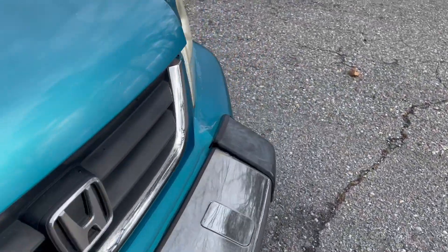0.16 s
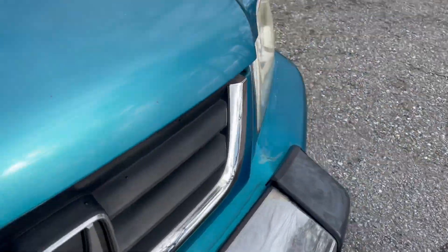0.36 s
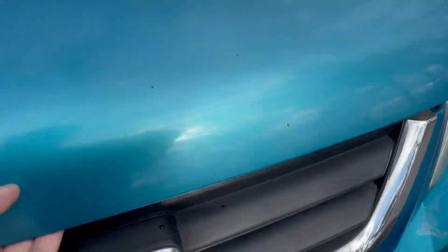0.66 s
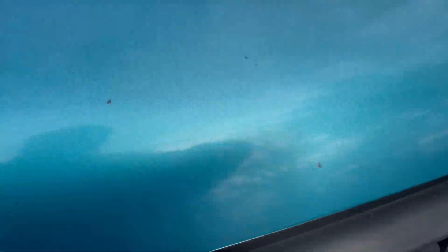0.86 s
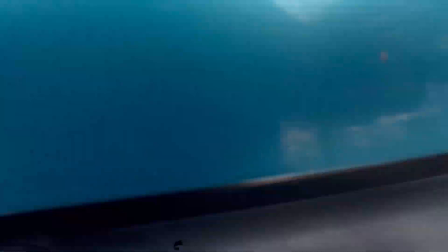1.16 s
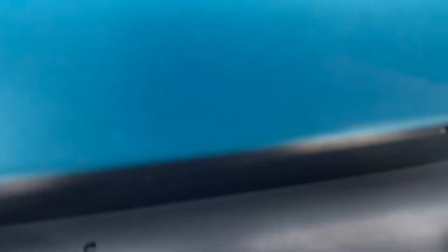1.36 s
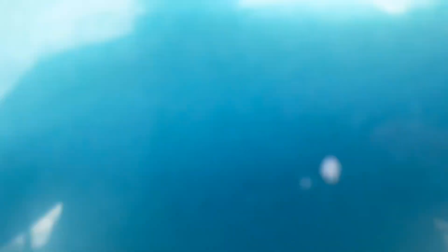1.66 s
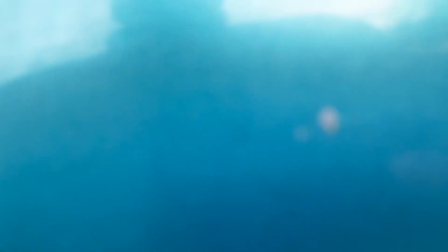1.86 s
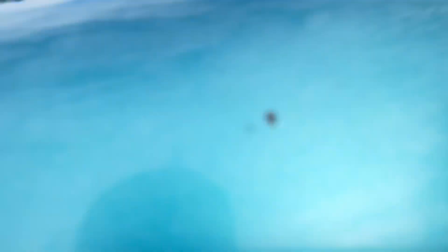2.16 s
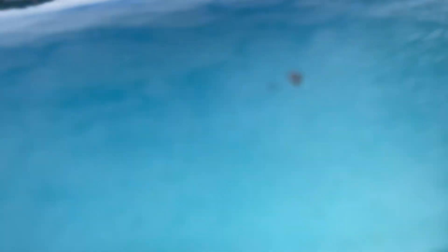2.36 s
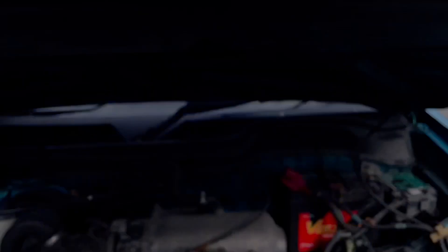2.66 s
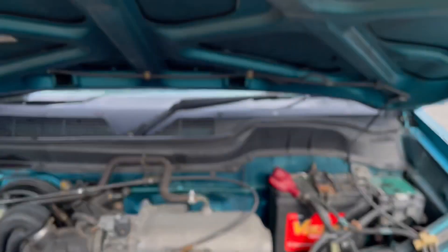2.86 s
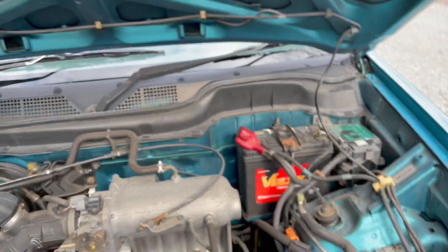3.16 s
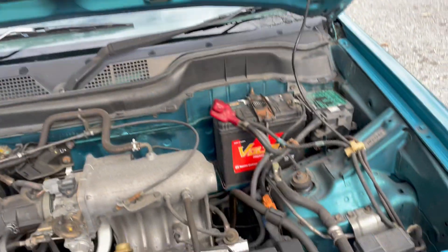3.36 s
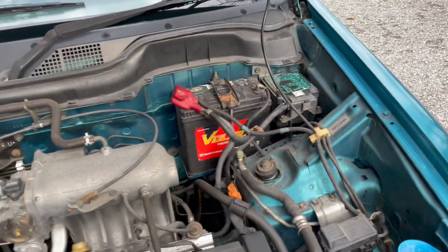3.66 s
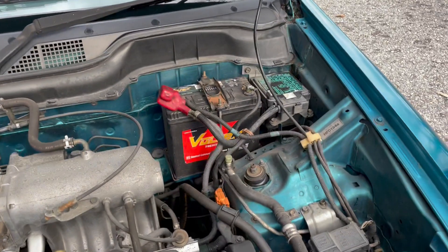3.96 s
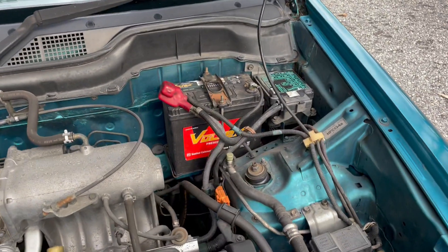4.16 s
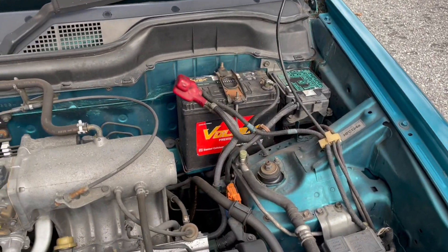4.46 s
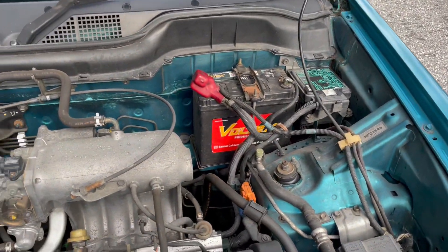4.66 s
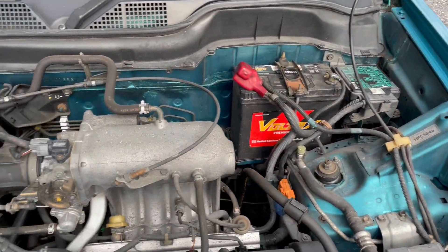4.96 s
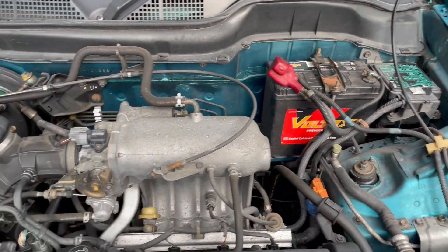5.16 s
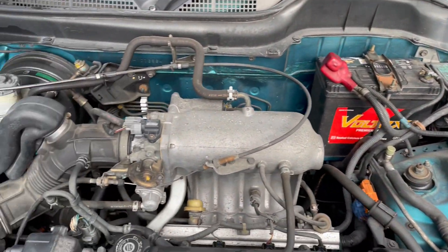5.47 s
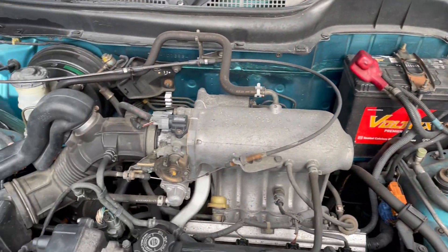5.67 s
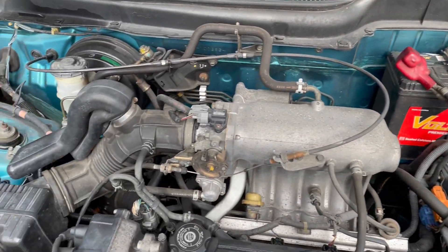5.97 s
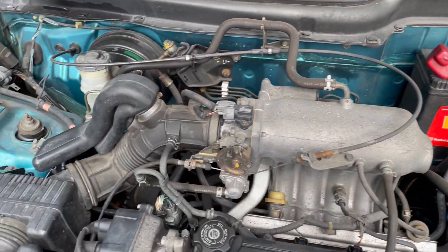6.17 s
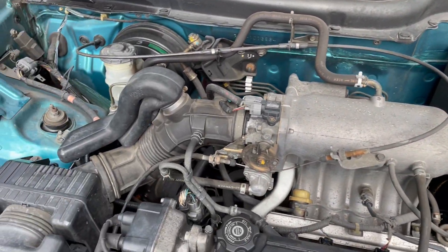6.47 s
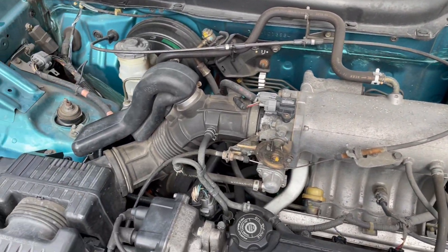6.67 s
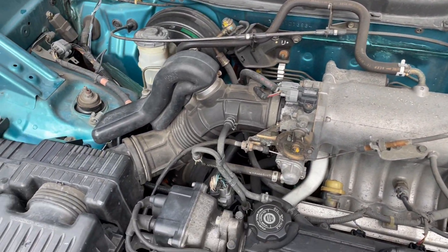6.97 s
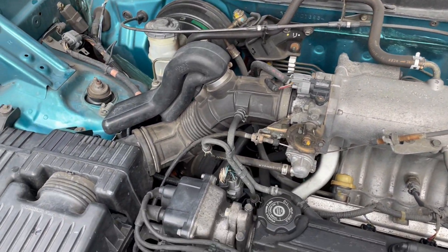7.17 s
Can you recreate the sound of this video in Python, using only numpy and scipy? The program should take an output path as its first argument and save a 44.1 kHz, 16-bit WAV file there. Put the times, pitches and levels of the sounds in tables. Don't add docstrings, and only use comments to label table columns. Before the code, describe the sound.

A small engine idles steadily close to a handheld microphone in open air. Small dull finger taps come first, followed by two hard metallic clacks under a second apart with short panel ringing. As the hood opens, muffled roar turns brighter, with fast repeating injector and valve ticks and soft steady belt and fan whine. Wind buffets the microphone in irregular low thumps, easing toward the end.

```python
import sys
import numpy as np
from scipy import signal
from scipy.fft import rfft, irfft
from scipy.io import wavfile
from scipy.ndimage import uniform_filter1d

SR = 44100
rng = np.random.default_rng(int(sys.argv[2]) if len(sys.argv) > 2 else 0)


def generate_wav(signal):
    frames = np.transpose(np.atleast_2d(signal))
    scaled = np.clip(frames, -1, 1) * 32767
    pcm = np.round(scaled).astype(np.int16)
    wavfile.write(sys.argv[1], SR, pcm)


def invert_db(level):
    return 10 ** (np.asarray(level, dtype=float) / 20)


N = 323253
T = np.arange(N) / SR
HZ = np.fft.rfftfreq(N, 1 / SR)


def unit(x):
    return x / np.sqrt(np.mean(x ** 2))


def curves(table):
    s, *columns = np.transpose(table)
    return [np.interp(T, s, column) for column in columns]


def shaped(x, gain):
    return irfft(rfft(x) * gain, N)


def resonance(hz, width):
    return 1j * HZ * width / (hz ** 2 - HZ ** 2 + 1j * HZ * width)


def walk(rate):
    points = int(rate * N / SR) + 2
    return unit(np.interp(T * rate, np.arange(points), rng.standard_normal(points)))


# peak_s, length_s, rumble_db, small_eddies_relative_db
GUST_SWELLS = [(.75, 0.49, -34.5, -8.5), (1.164, 0.069, -28, -19), (1.277, 0.18, -28.5, -4),
               (1.457, 0.18, -29.5, -4.5), (1.57, 0.14, -26.5, -3.5), (1.715, .12, -27, -5),
               (1.93, 0.18, -30.5, -0.5), (2.087, 0.16, -35, 2), (2.243, .15, -32, -7),
               (2.378, 0.13, -26, -6), (2.533, 0.16, -28.5, -7.5), (2.877, .2, -31.5, -8),
               (3.183, 0.24, -27.5, -11), (3.462, 0.18, -27, -13), (3.587, 0.13, -25.5, -5.5),
               (3.774, 0.24, -27, -6), (4.017, .15, -36, -9), (4.398, 0.73, -31.5, -8.5),
               (4.62, 0.091, -28, -5), (4.878, 0.43, -26.5, -2.5), (5.244, 0.13, -29, -8),
               (5.47, 0.17, -31, -4.5), (5.75, 0.62, -40.5, -25), (5.963, 0.1, -28, -7),
               (6.202, 0.27, -47, -14), (6.564, 0.1, -35, -11), (6.917, .35, -33, -10),
               (7.28, 0.085, -30, -24)]


def gusts():
    breeze_db, breeze_small_db = -43, -1.5
    s, length, db, small_db = np.transpose(GUST_SWELLS)[:, :, None]
    power = invert_db(2 * db) * np.exp(-8 * ((T - s) / length) ** 2)
    large = invert_db(2 * breeze_db) + power.sum(axis=0)
    small = invert_db(2 * (breeze_db + breeze_small_db)) + (power * invert_db(2 * small_db)).sum(axis=0)
    return np.sqrt(large), np.sqrt(small)


def eddy(hz, cycles):
    u = np.arange(int(cycles * 2.8 * SR / hz)) * hz / SR
    swell = u / cycles * 3
    return np.sin(2 * np.pi * u / (1 + 0.035 * u)) * swell * np.exp(1 - swell)


def eddy_swarm(lo_hz, hi_hz, rate, strength):
    swarm = np.zeros((2, N))
    for hz in np.geomspace(lo_hz, hi_hz, num=5):
        arrives = rng.random((2, N)) < rate / 5 / SR
        sign = rng.choice([-1, 1], (2, N))
        size_db = 3.8 * np.minimum(rng.exponential(size=(2, N)), 2.6)
        hits = arrives * sign * invert_db(size_db)
        swarm += signal.fftconvolve(hits, eddy(hz, cycles=1.61)[None])[:, :N]
    bed = shaped(rng.standard_normal((2, N)), resonance(np.sqrt(lo_hz * hi_hz), hi_hz - lo_hz))
    swarm += 0.5 * np.std(swarm) * unit(bed)
    steady = swarm / uniform_filter1d(swarm ** 2, size=3500, axis=1) ** 0.28
    return unit(steady) * strength


# start_s, peak_db, pitch_hz, left_minus_right_db
LONE_EDDIES = [(0.714, -15, 92, 2), (0.791, -14, 156, 0.5), (1.277, -6, 81, 2), (1.326, -7, 124, 3),
               (1.359, -7, 182, 3), (1.476, -4, 171, 1), (1.542, -2.5, 134, 7), (1.568, -5.5, 93, 3),
               (1.717, -3, 81.7, 5), (1.775, -3.5, 143, 4), (1.819, -5.5, 246, 5), (1.867, -11, 85, 4),
               (2.185, -11.5, 147, 0.0), (2.226, -12.5, 114, 4), (2.35, -8, 110, 0.5),
               (2.489, -14, 116, -9), (3.182, -4.5, 104, 3), (3.34, -10, 216, 5), (3.426, -13, 134, 1),
               (3.555, -10, 96.9, -2), (3.717, -6.5, 156, 0.5), (3.799, -15, 87.4, 2),
               (4.077, -12.5, 102, -1), (4.713, -11.5, 113, 0.5), (4.758, -5.5, 268, 0.0),
               (4.843, -20, 172, 0.0), (4.948, -12, 180, 0.5), (4.999, -11, 95.5, 1.0),
               (5.471, -13, 170, 2), (5.968, -11, 81.5, 1)]


def lone_pops():
    out = np.zeros((2, N))
    for s, db, hz, pan_db in LONE_EDDIES:
        pop = eddy(hz, cycles=0.68)
        i = int((s + 0.00773) * SR)
        sides = invert_db(db - 5.0 + np.array([pan_db, -pan_db]) / 2)
        out[:, i:i + len(pop)] += np.outer(sides, pop[:N - i])
    return out


def wind():
    large, small = gusts()
    mid, side = eddy_swarm(50.6, 170, 110., large) + eddy_swarm(202, 567, 160., small * invert_db(2.0))
    out = np.array([mid + 0.28 * side, mid - 0.31 * side]) + lone_pops()
    return signal.sosfilt(signal.butter(4, 1500, fs=SR, output="sos"), out)


# start_s, peak_db, ring_hz, decay_t60_s
FINGER_TAPS = [(.245, -21, 1300, .012), (.262, -27, 1100, .02), (.314, -28, 1300, .04),
               (.602, -21, 600, .012), (.61, -28, 800, .07), (.618, -25, 1300, .06), (.626, -24, 900, .05),
               (.634, -27, 1500, .05), (.6435, -17, 1450, .03), (1.168, -27, 2500, .15),
               (1.19, -15, 330, .16), (1.186, -16, 750, .12), (1.915, -13, 800, .22), (1.92, -15, 330, .25),
               (1.471, -17, 800, .03), (1.892, -25, 4200, .2), (1.898, -18, 4500, .06),
               (3.7235, -14, 520, .02), (3.566, -17, 380, .02), (3.172, -20, 380, .03)]


def taps():
    out = np.zeros((2, N))
    for s, db, hz, t60 in FINGER_TAPS:
        scuff = rng.standard_normal((2, N)) * (T >= s) * invert_db(-60 * np.maximum(T - s, 0) / t60)
        hit = shaped(scuff, resonance(hz, 0.55 * hz) ** 2)
        out += invert_db(db) * hit / abs(hit[0]).max()
    return out


# start_s, peak_db, hollow_ring_hz, panel_db, crack_db, decay_t60_s, rattle_rise_s
LATCH_BLOWS = [
    (1.1815, -6, 430, 3, -7, .085, .003),
    (1.9025, -1.5, 560, 3, -1, .065, .006),
]
# pitch_hz, level_db, decay_t60_s
HOOD_MODES = [(1177, -7, 0.13), (1508, -1, 0.016), (1873, -0.5, 0.2), (3052, 2.5, 0.16), (3340, -6, 0.059),
              (3980, -3, 0.023), (4580, -2, 0.076), (4280, -17, 0.1), (4960, -26, 0.12), (6730, 0, 0.02)]


def latch():
    out = np.zeros((2, N))
    panel = 0
    for k, (hz, db, t60) in enumerate(HOOD_MODES):
        panel = panel + invert_db(db) * resonance(hz, 2.17 / t60 * 2.8) * (-1) ** k
    dull = 1 / (1 + 1j * HZ / 6500) ** 3
    crack_ring = 0.5 * resonance(7700, 7700) + 0.14 * resonance(9500, 2900) ** 2
    for s, db, hz, panel_db, crack_db, t60, rise in LATCH_BLOWS:
        age = np.maximum(T - s, 0)
        build_up = np.minimum(age / rise, 1)
        noise = rng.standard_normal((2, N)) * (T >= s)
        rattle = noise * (0.25 + build_up) * invert_db(-60 * np.maximum(age - rise, 0) / t60)
        crack = noise * invert_db(crack_db - 60 * age / 0.03)
        flutter_db = 3.7 * walk(rate=120.)
        hollow = build_up * invert_db(-60 * age / (2 * t60) + flutter_db) * np.sin(2 * np.pi * hz * age)
        metal = invert_db(panel_db) * (0.91 * panel + 0.5 * resonance(1750, 1570))
        hit = shaped(rattle, dull * (resonance(hz, 0.5 * hz) + metal)) + shaped(crack, crack_ring)
        hit[0] += 0.24 * abs(hit[0]).max() * hollow
        out += invert_db(db) * hit / abs(hit[0]).max()
    return out


def whine(table, waver_hz, flutter_db):
    hz, db = curves(table)
    fade = np.clip((T - table[0][0]) / 0.14, 0, 1)
    phase = 2 * np.pi * np.cumsum(hz + waver_hz * walk(rate=25.)) / SR
    return np.sqrt(2) * fade * invert_db(db + flutter_db * walk(rate=15.)) * np.sin(phase)


# start_s, pitch_hz, level_db
FAN_TONE = [(0, 410, -58), (.5, 405, -46.5), (1.1, 408, -59), (1.4, 404, -39), (5.6, 403.6, -70),
            (6.2, 407, -44), (7.33, 407, -45)]


def fan():
    return whine(FAN_TONE, waver_hz=2., flutter_db=2.)


# start_s, pitch_hz, level_db
PUMP_TONE = [(2.85, 441, -46), (3.1, 440, -41), (3.7, 440, -42), (4.1, 434, -49), (4.6, 436, -43),
             (5.6, 432, -45), (6.1, 435, -40), (7.33, 436, -40)]


def pump():
    return whine(PUMP_TONE, waver_hz=3.5, flutter_db=3.)


# start_s, pitch_hz, level_db
ALTERNATOR_TONE = [(0, 488, -50), (2.2, 488, -48), (2.8, 488, -44), (3.4, 488, -49), (4.2, 488, -49),
                   (4.7, 488, -45), (6, 488, -42), (7.33, 488, -42)]


def alternator():
    return whine(ALTERNATOR_TONE, waver_hz=1.5, flutter_db=2.5)


# start_s, nearness_db, hood_opening_0_to_1, place_0_to_1 (battery to valve cover)
PHONE_PATH = [(0, -6, 0.08, 0), (.5, 0.5, 0, 0.051), (1.1, 1.5, 0, 0.55), (1.35, 4, 0.25, 0.29),
              (1.65, 0.5, 0.31, 0.29), (1.95, 2, .65, 0.3), (2.15, 2, 0.85, 0.99), (2.3, 0, 0.82, 0.49),
              (2.8, 0.5, 1, 0.14), (3.3, -.5, 0.99, 0.2), (4.4, 0, 1, 0), (5, .5, 1, 0.081),
              (5.7, 1, 0.96, 0.5), (6.2, 1, 0.96, 0.77), (7.33, 0.5, 0.9, 0.65)]


def visit():
    near_db, opening, along = curves(PHONE_PATH)
    opening, along = np.clip(opening, 0, 1), np.clip(along, 0, 1)
    ajar = 4 * opening * (1 - opening)
    return near_db, opening, ajar, opening * (1 - along), along


# hood_shut_db, hood_open_db, valve_cover_extra_db, nearness_share
RANGE_LEVELS = [
    (-44, -41, 0.5, 0.13),
    (-40, -36.5, 0.5, 1.3),
    (-45.5, -36.5, 0.5, 0.82),
    (-52, -38, -0.6, 0.78),
]
# pitch_hz, width_hz, level_db
SHUT_COLOUR = [(950, 210, -9), (1610, 120, -2.5), (2020, 180, 1.5), (4700, 700, 2)]
AJAR_COLOUR = [(850, 170, -4), (1260, 200, 1.5), (3580, 910, 5.5), (5070, 1660, -3)]
BATTERY_COLOUR = [(454, 220, -4), (1365, 110, 2.5), (3860, 1000, 2.5)]
COVER_COLOUR = [(306, 63, -16.5), (574, 150, 0)]


def escape_from_bay(spectrum):
    near_db, opening, ajar, battery, cover = visit()
    below = [1 / (1 + (HZ / edge_hz) ** 6) for edge_hz in (800, 1500, 7500)]
    shares = below[0], below[1] - below[0], below[2] - below[1], 1 - below[2]
    bands_hz = (450, 750), (800, 1500), (1500, 6000), (10000, 15000)
    out = 0
    for share, (lo_hz, hi_hz), levels in zip(shares, bands_hz, RANGE_LEVELS):
        shut_db, open_db, cover_db, heard = levels
        db = shut_db + (open_db - shut_db) * opening + cover_db * cover + heard * near_db
        band = spectrum[0, (HZ > lo_hz) & (HZ < hi_hz)]
        rms = np.sqrt(2 * np.sum(abs(band) ** 2)) / N
        out = out + irfft(spectrum * share, N) * invert_db(db) / rms
    colours = (((1 - opening) ** 2, SHUT_COLOUR), (ajar, AJAR_COLOUR),
               (battery, BATTERY_COLOUR), (cover, COVER_COLOUR))
    for weight, table in colours:
        change = sum((invert_db(db) - 1) * abs(resonance(hz, width)) ** 2 for hz, width, db in table)
        out = out + weight * shaped(out, change)
    left_minus_right_db = 0.55 - 2.7 * ajar + 2.5 * battery
    return out, left_minus_right_db


# pitch_hz, level_db_per_hz
ROAR_SPECTRUM = [(40, -16), (70, 0), (250, -8), (430, -4.5), (700, -8.5), (1300, -7), (2500, -5.5),
                 (4500, -13.5), (8000, -19.5), (11500, -20), (14200, -27), (15600, -29), (16050, -60)]
# pitch_hz, width_hz, over_roar_db
CASTING_MODES = [(620, 45, 5), (790, 25, 5), (955, 45, 4), (1270, 150, 5), (1900, 120, 5), (2310, 70, 5),
                 (3200, 110, 4), (3820, 130, 5), (4700, 90, 5), (5230, 140, 5), (6150, 130, 4),
                 (6560, 80, 5)]


def engine_colour():
    hz, db = np.transpose(ROAR_SPECTRUM)
    colour = invert_db(np.interp(np.log(HZ + 1), np.log(hz), db))
    for hz, width, db in CASTING_MODES:
        colour = colour * (1 + (invert_db(db) - 1) * abs(resonance(hz, width)) ** 2)
    return colour / (1 + (HZ / 15300) ** 60)


def decays(times, sizes, rise_ms, ms, repeat):
    hits = np.zeros(N)
    inside = (times > 0) * (times < N / SR)
    np.add.at(hits, np.clip(times * SR, 0, N - 1).astype(int), sizes * inside)
    age_ms = np.arange(2000) * 1000 / SR
    shape = np.exp(-age_ms / ms) * np.minimum(age_ms / rise_ms, 1)
    same = signal.fftconvolve(hits[None], shape * rng.standard_normal((2, len(shape))))[:, :N]
    fresh = signal.fftconvolve(hits, shape)[:N] * rng.standard_normal((2, N))
    return np.sqrt(repeat) * same + np.sqrt(1 - repeat) * fresh


# start_s, cam_late_ms (against a steady idle)
IDLE_HUNTING = [(0.08, 14.7), (0.55, 12.3), (1.03, 8.7), (1.5, 4.0), (1.98, 0.0), (2.45, -2.7),
                (2.92, -2.3), (3.4, -6.3), (3.87, -9.7), (4.35, -6.3), (4.82, -5.0), (5.3, -3.3),
                (5.77, 0.7), (6.25, 1.0), (6.72, 0.3), (7.19, 0.7)]
PART_RINGS = {"injector": ([(9700, 1600, -5), (11200, 1600, -1), (13180, 1930, 6.5)], 0.69, 7.9),
              "valve": ([(3100, 570, -7.5), (3380, 710, 2.5), (5070, 320, 6), (6300, 740, 1),
              (8650, 3600, 7.5), (12300, 5900, -5)], 3.5, 5), "tappet": ([(1470, 58, -16.5),
              (1810, 490, -1), (2420, 200, 1.5), (4720, 1600, -6), (6700, 830, -9)], 4.6, 5.2),
              "rocker": ([(1240, 720, -1), (2350, 1300, 1.5), (3780, 900, 6.5), (4400, 120, 7)], 2.8, 3.84)}
# part, start_ms, over_roar_db
CAM_PATTERN = [("injector", 4, 0.44), ("injector", 42.5, 4.7), ("injector", 82, 1.8),
               ("injector", 122, 2.3), ("valve", 15.44, 1.45), ("valve", 57, 3.5), ("valve", 97, 0.9),
               ("valve", 160, 1), ("tappet", 58, 12.6), ("tappet", 64, 2.9), ("tappet", 58, -1.4),
               ("rocker", 22.4, -1.3), ("rocker", 100, -1.8), ("rocker", 140, 1), ("rocker", 130, 3.3)]


def cam_ticks(cover):
    firing_hz = 25.3
    turns = np.arange(-1, 48) * 4 / firing_hz
    turns = turns + np.interp(turns + 2 / firing_hz, *np.transpose(IDLE_HUNTING)) / 1000
    out = np.zeros((2, N))
    for part, (rings, rise_ms, decay_ms) in PART_RINGS.items():
        ms, db = np.transpose([row[1:] for row in CAM_PATTERN if row[0] == part])
        late, harder = rng.standard_normal((2, len(turns), len(ms)))
        times = turns[:, None] + (ms + 0.71 * late) / 1000
        sizes = invert_db(db + 1.2 * harder)
        burst = decays(times.ravel(), sizes.ravel(), rise_ms, decay_ms, repeat=0.85)
        if part == "tappet":
            burst = burst * invert_db(-1.5 + 6 * cover)
        out += shaped(burst, 1.93 * sum(invert_db(g) * resonance(hz, width) for hz, width, g in rings))
    return out


def engine():
    cover = visit()[-1]
    roar = rng.standard_normal((2, N)) * invert_db(1.0 * walk(rate=9.))
    return escape_from_bay(rfft(roar + cam_ticks(cover)) * engine_colour())


# pitch_hz, right_leads_radians
PORT_TWIST = [(0, 0), (700, -.3), (2000, -.1), (2800, -1), (4500, -.6), (8200, 2.95), (9100, 3.3),
              (13600, 6.28)]
# pitch_hz, level_db
PORT_APART = [(0, -5.5), (300, -7.5), (700, -6), (2000, -6.5), (4000, -2.5), (8000, -19), (11000, -81),
              (14000, -22)]


def ports(pair, pan_db):
    turn = np.exp(1j * np.interp(HZ, *np.transpose(PORT_TWIST)) / 2)
    apart = shaped(pair[1], invert_db(np.interp(HZ, *np.transpose(PORT_APART))))
    both = np.array([shaped(pair[0], 1 / turn) + apart, shaped(pair[0], turn) - apart])
    both += shaped(pair[1], 1j * invert_db(-15.3) * abs(resonance(8300, 2500)) ** 2)
    leaning = shaped(both, 1 / (1 + (HZ / 5000) ** 6))
    return both + leaning * (invert_db(np.array([pan_db, -pan_db]) / 2) - 1)


def scene():
    motor, pan_db = engine()
    motor[0] += alternator() + pump() + fan()
    return ports(motor + latch() + taps(), pan_db) + wind()


def low_pass(x):
    return signal.sosfilt(signal.butter(12, 16650, fs=SR, output="sos"), x)


def record(dry):
    x = signal.sosfilt(signal.butter(3, 48, "high", fs=SR, output="sos"), dry)
    x = signal.sosfilt(signal.ellip(8, 0.2, 70, 16450, fs=SR, output="sos"), x)
    sag = 1. * (abs(x).max(axis=0) > 0.5)
    keep = np.exp(-1 / (0.032 * SR))
    for _ in range(4):
        sag = signal.lfilter([1 - keep], [1, -keep], sag)
    x = x * invert_db(-8.5 * sag / sag.max())
    return low_pass(x)


dry = scene()
out = record(dry)
generate_wav(out)
```